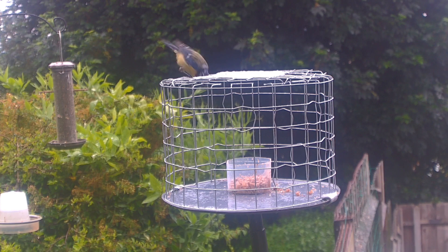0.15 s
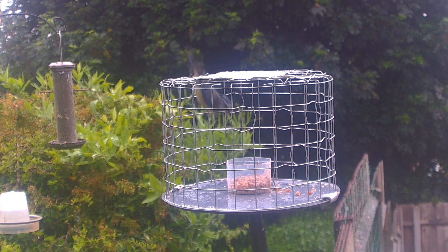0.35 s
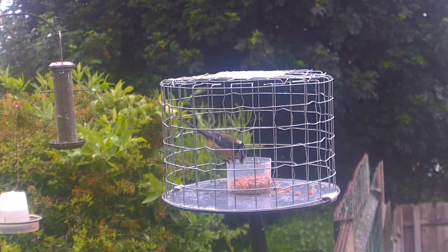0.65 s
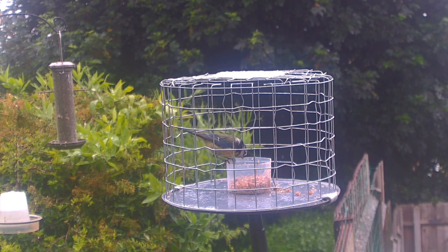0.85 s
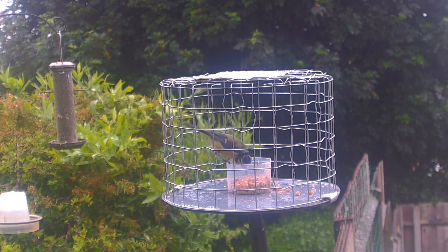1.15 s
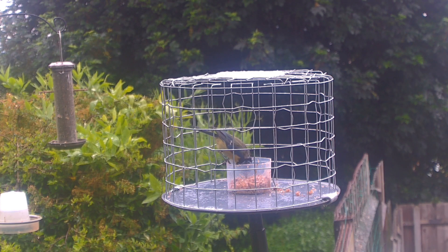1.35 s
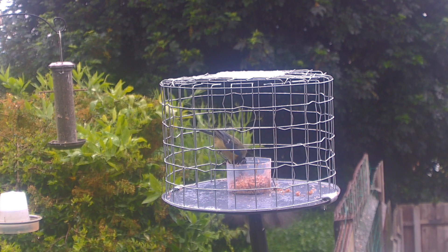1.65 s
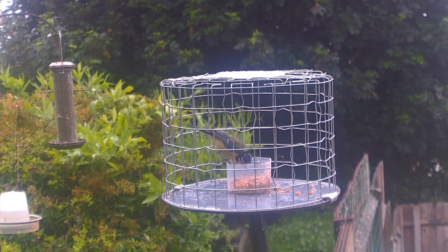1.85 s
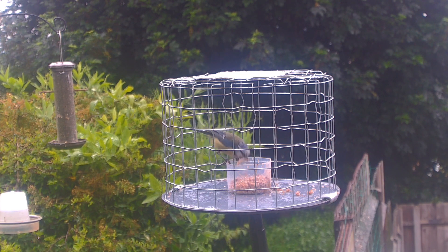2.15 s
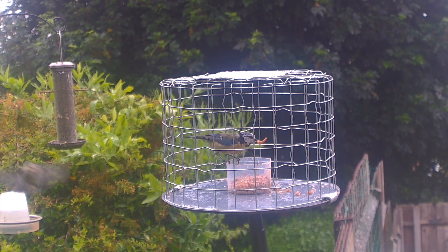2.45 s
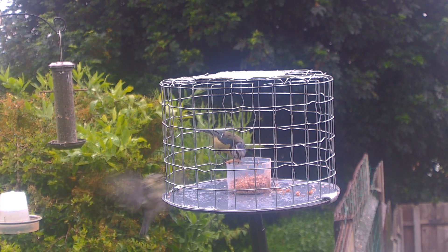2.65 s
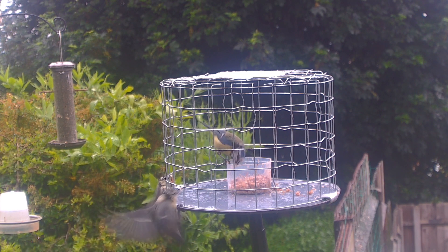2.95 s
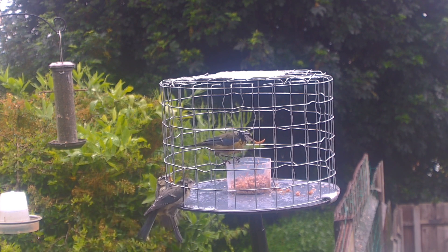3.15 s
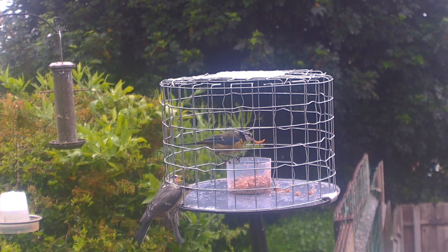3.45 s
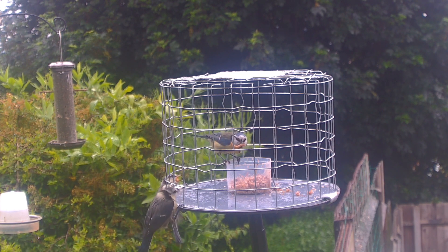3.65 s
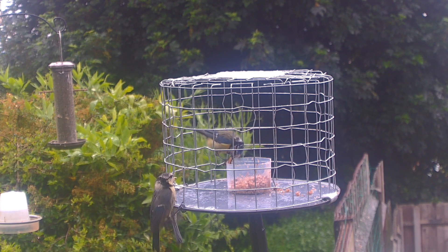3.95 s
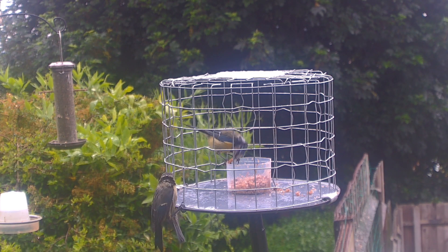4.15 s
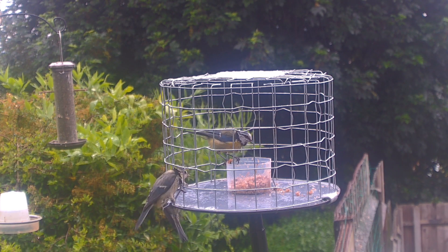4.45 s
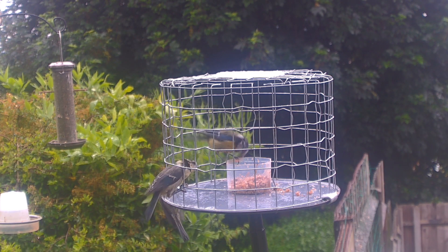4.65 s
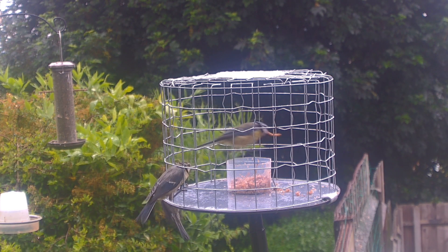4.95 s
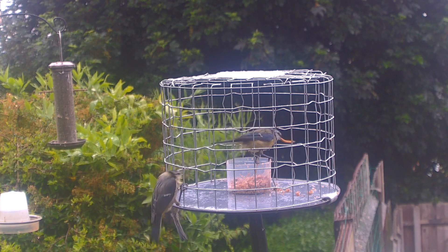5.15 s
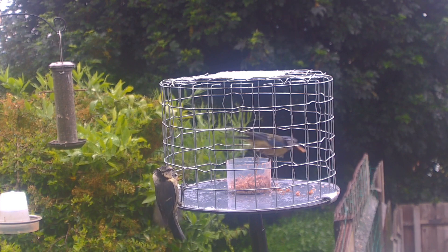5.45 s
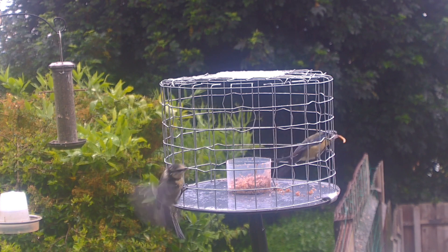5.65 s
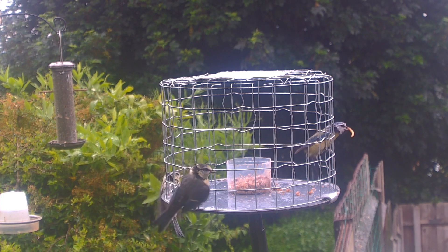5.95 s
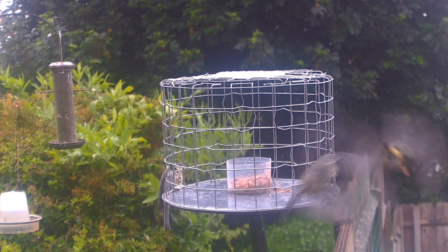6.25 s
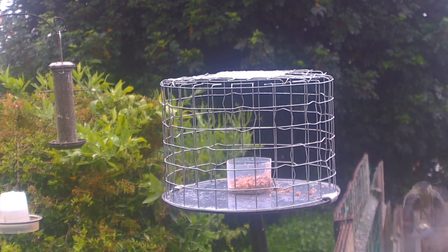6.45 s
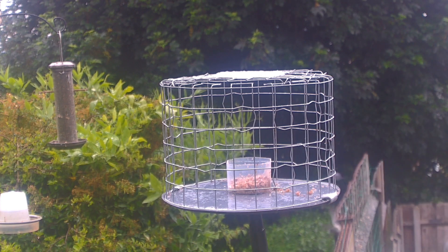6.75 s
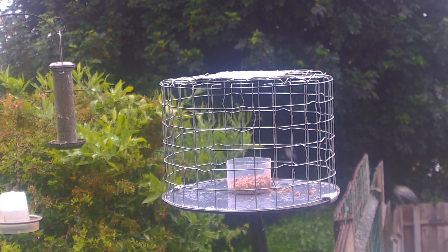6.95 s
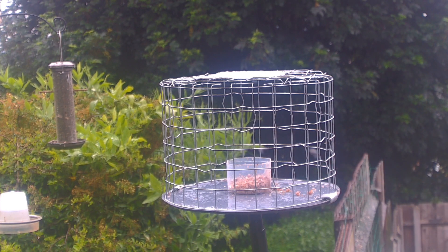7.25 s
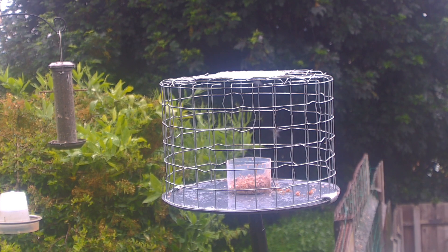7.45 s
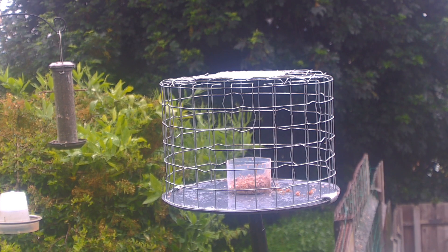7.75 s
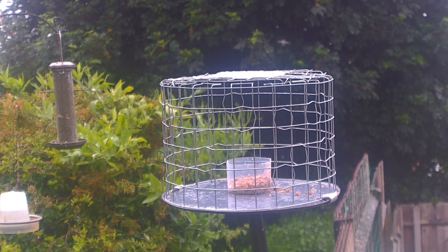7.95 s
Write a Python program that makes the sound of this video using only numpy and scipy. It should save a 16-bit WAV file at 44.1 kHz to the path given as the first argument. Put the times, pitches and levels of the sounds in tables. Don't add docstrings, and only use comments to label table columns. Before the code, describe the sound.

Thin piercing bird peeps give way to urgent fledgling begging calls, with tiny ticks on wire, soft rain hiss and faint rumble in a garden.

```python
import sys
import numpy as np
from scipy import signal
from scipy.fft import rfft, irfft, next_fast_len
from scipy.io import wavfile
from scipy.ndimage import uniform_filter1d, map_coordinates

SR = 44100
rng = np.random.default_rng(int(sys.argv[2]) if len(sys.argv) > 2 else 0)


def int16_out(signal):
    q = np.round(np.clip(np.atleast_2d(signal).T, -1, 1) * 32767)
    wavfile.write(sys.argv[1], SR, q.astype(np.int16))


def attenuation_scalar(level_db):
    decades = np.asarray(level_db, float) / 20
    return 10 ** decades


N = 357210
T = np.arange(N) / SR

# hz, level_db
RAIN_SPECTRUM = [(300, -55.5), (700, -22.5), (1500, -15), (1950, -13.5), (2220, -4.5), (2450, 1.5),
                 (2950, -13), (3700, -14), (4460, -29), (6750, -36), (7500, -36.5), (8000, -53.5)]
# hz, level_db
RUMBLE_SPECTRUM = [(12, -26), (25, 1.5), (50, -2.5), (80, -13), (135, -13), (190, -19), (250, -21),
                   (450, -26), (800, -36.5), (2000, -64)]
# hz, rms_db
HUM_LINES = [(50, -53), (100, -66.5), (150, -64), (166, -69), (250, -77.5), (350, -91.5)]
# start_s, peak_db
TICKS = [
    (.004, -42.5),
    (0.031, -47),
    (2.851, -52),
    (2.954, -43),
    (3.012, -48),
    (3.059, -41),
    (3.262, -45.5),
    (3.301, -42),
    (5.722, -53),
    (7.882, -50),
]
# reached_s, top_hz, held_s, sag_hz_per_ms, peak_db
SEEPS = [(.012, 3745, 0.018, 4, -51), (.21, 7180, .08, 12.5, -42), (.378, 6950, .052, 24.5, -38),
         (1.575, 6660, .016, 4, -43.5), (1.677, 6960, 0.051, 12, -37), (1.825, 6410, .025, 15, -37.5),
         (5.49, 7840, 0.046, 10.5, -50.5), (5.749, 7900, .03, 17.5, -48), (5.856, 7890, 0.067, 9.5, -38.5),
         (6.006, 7620, 0.08, 9, -37.5), (6.741, 7280, 0.077, 18, -37.5), (7.15, 7000, 0.12, 9, -66),
         (7.502, 7050, .017, -14, -50.5), (7.603, 7620, .02, -9, -54), (7.715, 7620, .075, 12, -57),
         (7.975, 7380, 0.017, 14, -56)]
# length_s, first_hz, peak_db
SEEP_CLIMBS = [(0.007, 3000, -70), (.016, 4800, -54), (.006, 6700, -47), (0.016, 3100, -51.5),
               (0.035, 3500, -58), (.018, 3600, -38.5), (.02, 3100, -53.5), (0.034, 2000, -51),
               (0.017, 4000, -54), (.025, 2300, -52.5), (0.013, 4500, -56), (.01, 7100, -85),
               (0.036, 2900, -56), (0.016, 4300, -57), (.015, 3770, -80), (.015, 4200, -68)]
# reached_s, top_hz, held_s, sag_hz_per_ms, peak_db
BEGS = [(2.548, 6500, .003, 8, -60), (2.643, 6600, .013, -32.5, -58), (2.772, 7000, 0.021, -30.5, -44.5),
        (2.907, 6410, .015, -42, -53.5), (3.112, 4600, .003, 0, -54), (3.22, 7760, 0.042, 11.5, -29),
        (3.354, 7660, .056, 15.5, -34), (4.369, 7140, .018, 5.5, -35), (4.52, 7170, .04, 5.5, -36),
        (5.24, 6960, 0.012, 20, -40.5), (5.384, 7470, 0.028, 3.5, -39), (6.653, 6990, 0.0074, 20, -53)]
# climb_s, climb_start_hz, peak_db, lead_in_s
CHURRS = [(.024, 2450, -42.5, .014), (0.019, 2800, -43, .016), (.022, 2400, -43.5, .011),
          (.026, 2400, -40, .016), (.015, 2600, -39.5, .008), (.021, 2300, -42.5, .007),
          (0.027, 2350, -47.5, 0.0082), (.027, 2400, -36, .024), (.037, 2650, -39, .018),
          (.032, 2700, -40, 0.038), (.029, 2800, -44, 0.0095), (.021, 2250, -41.5, .025)]
UPPER_DB = [-24, -19, -24, -0.5, -15, -8, 1.5, -1.5, -0.5, -3, -10, -20, -1.5, -15, -15, -12, -2, 2, 1.5, 2,
            2, -1.5, 1.5, -0.5, -0.5, -4.5, -4, -9.5]
# landed_s, last_hz, tail_s, peak_db
FALLS = [
    (.456, 2780, 0.045, -45.5),
    (1.864, 2537, .055, -47),
    (6.83, 3300, 0.004, -44),
]
# start_s, length_s, top_hz, rising_share, peak_db
ARCHES = [
    (3.469, 0.12, 3600, 0.27, -43.5),
    (3.66, 0.11, 3170, .55, -37.5),
    (3.805, .095, 3340, 0.82, -37.5),
    (3.96, .14, 3273, .5, -39),
    (4.193, 0.099, 2767, 0.63, -37),
    (4.631, .126, 3284, 0.6, -41),
    (5.102, .055, 2610, .69, -38.5),
    (6.16, .119, 2812, 0.45, -43),
    (6.911, 0.14, 2850, 0.6, -45),
]
# first_hz, upper_over_lower, last_over_top, rise_bend, upper_db
VOICING = [(1940, 1.17, .76, 0.7, 3), (2000, 1.15, .82, .8, -1), (1960, 1.22, .95, .7, -1),
           (2010, 1.22, .77, 1.1, 1.5), (1920, 1.2, 0.69, 1.4, 0.5), (1980, 1.19, .76, 1, 3.5),
           (1940, 1.2, 0.91, 1, 0.5), (2120, 1.16, .91, 1.1, -0.5), (2225, 1.28, 0.9, 0.86, 2)]
# centre_s, pitch_factor, half_width_s
FLICKS = [
    (3.499, 1.3, 0.017),
    (3.713, 1.13, 0.011),
    (3.842, 1.14, .012),
    (3.885, 1.75, .017),
    (4.255, 1.11, .014),
    (4.691, 1.1, .01),
    (5.137, 1.08, .012),
]
# hz, gain_db
THROAT = [(1900, -2.5), (2500, 0), (3200, -1.54), (3900, -2.5), (5000, 2.6), (6200, 1.5), (7500, 0.7)]
# time_s, treble_db
FACING = [(0, -6.5), (1.4, -6.5), (2.4, -14), (2.95, -13), (3.15, -7), (3.4, -6.5), (3.6, -1.5),
          (5.3, -2.5), (6.3, -2), (6.6, -14), (6.7, -4.5), (7.1, -4.5), (7.4, -12.5)]
# delay_s, level_db
WALLS = [
    (.0075, -5),
    (.015, -7),
    (.022, -10),
    (.031, -16),
]
# hz, gain_db
ECHO_TREBLE = [(4000, -2), (5200, -8), (7500, -15)]
# start_s, end_s, start_hz, end_hz, level_db
FAR_NOTES = [
    (1.85, 3.05, 240, 210, -66.5),
    (6.48, 6.58, 1150, 1150, -72),
    (5.51, 5.535, 2150, 1900, -60),
    (7.16, 7.21, 1550, 1900, -72),
]
# hz, gain_db
MIC_CAVITY = [(1000, -24.5), (1800, -29), (2430, -0.5), (3000, -9.5), (3800, -0.5), (4700, -11.5),
              (7300, -11), (7900, -23), (8050, -74)]
# start_s, end_s
DROPOUTS = [
    (2.835, 2.895),
    (3.027, 3.15),
    (3.607, 3.725),
    (4.18, 4.238),
    (4.63, 4.688),
    (5.077, 5.135),
]

LEAD_HZ, LANDING_HZ, LONG_LEAD_S = 1877, 3440, .021
LOW_GAP, LINGER_GAP, CLIMB_GAP, FALL_GAP = 1.23, 1.29, 1.27, 1.28
ONSET_DB, LEAD_UPPER_DB, CLIMB_DB, CLIMB_UPPER_DB, SILENT_DB = -5.5, 3, -4, 2, -87
SWELL_SHARE = 0.31


def unit(x):
    return x / np.sqrt(np.mean(x ** 2) + 1e-20)


def coloured(x, points):
    m = next_fast_len(len(x) + 8192)
    hz, db = np.transpose(points)
    bins_hz = np.fft.rfftfreq(m, 1 / SR)
    gain = attenuation_scalar(np.interp(np.log(bins_hz + 1), np.log(hz), db))
    return irfft(rfft(x, m) * gain, m)[:len(x)]


def wobble(rate_hz, count=N):
    knots = rng.standard_normal(int(count * rate_hz / SR) + 4)
    return map_coordinates(knots, [np.arange(count) * rate_hz / SR])


def fade(t, start_s, end_s, rise_s, fall_s):
    return np.clip((t - start_s) / rise_s, 0, 1) * np.clip((end_s - t) / fall_s, 0, 1)


def rain():
    density_db = 1.2 * wobble(300) + .6 * wobble(12) + .4 * wobble(1.2)
    drops = rng.standard_normal(N) * attenuation_scalar(density_db)
    hiss = attenuation_scalar(-61) * unit(coloured(drops, RAIN_SPECTRUM))
    rumble = unit(coloured(rng.standard_normal(N), RUMBLE_SPECTRUM))
    return hiss + attenuation_scalar(-59 + .8 * wobble(2.5)) * rumble


def hum():
    out = np.zeros(N)
    for hz, db in HUM_LINES:
        out += attenuation_scalar(db + 2 + 0.15 * wobble(5)) * np.sin(2 * np.pi * (hz * T + rng.random()))
    return out


def ticks():
    out, t = np.zeros(N), np.arange(1200) / SR
    shape = attenuation_scalar(-60 * t / .025) * (1 - np.exp(-t / .0006))
    for start_s, db in TICKS:
        out[round(start_s * SR):][:len(t)] += attenuation_scalar(db + 11) * shape * unit(rng.standard_normal(len(t)))
    return coloured(out, [(3600, 0), (4800, -12), (7500, -26)])


def rising(upper_db, reached_s, top_hz, held_s, sag, note_db, climb_s, knee_hz, db, lead_s=0):
    def climb_hz(share):
        return knee_hz * (top_hz / knee_hz) ** share

    def held_hz(share):
        return top_hz - 1000 * sag * held_s * share

    up_db = db + upper_db
    knee_s, end_s = reached_s - climb_s, reached_s + held_s
    rows = []
    if lead_s:
        risen = 0.091 if lead_s > LONG_LEAD_S else 0.531
        linger_hz = LEAD_HZ + risen * (knee_hz - LEAD_HZ)
        rows += [(knee_s - lead_s, LEAD_HZ, LOW_GAP, db + ONSET_DB, up_db + ONSET_DB + LEAD_UPPER_DB),
                 (knee_s - lead_s * .4, linger_hz, LINGER_GAP, db - 2.5, up_db + LEAD_UPPER_DB)]
    lower_db, upper_db = db + CLIMB_DB, up_db + CLIMB_DB + CLIMB_UPPER_DB
    rows += [(knee_s, knee_hz, LOW_GAP, db, up_db + LEAD_UPPER_DB),
             (reached_s - climb_s / 2, climb_hz(.52), CLIMB_GAP, lower_db, upper_db),
             (reached_s - climb_s / 4, climb_hz(.84), CLIMB_GAP, lower_db, upper_db),
             (reached_s, top_hz, LOW_GAP, note_db - 6.5, SILENT_DB),
             (reached_s + held_s * SWELL_SHARE, held_hz(SWELL_SHARE * 0.57), LOW_GAP, note_db, SILENT_DB),
             (end_s, held_hz(1), LOW_GAP, note_db - 8, SILENT_DB)]
    for landed_s, last_hz, tail_s, fall_db in FALLS:
        if reached_s < landed_s < end_s + .05:
            rows[-1] = (end_s, held_hz(1), LOW_GAP, note_db, SILENT_DB)
            plunge_s = end_s + .4 * (landed_s - end_s)
            plunge_hz = LANDING_HZ + 0.46 * (held_hz(1) - LANDING_HZ)
            rows += [(plunge_s, plunge_hz, LOW_GAP, fall_db + 5, fall_db + 1),
                     (landed_s, LANDING_HZ, FALL_GAP, fall_db, fall_db),
                     (landed_s + tail_s * .35, last_hz * 1.12, FALL_GAP, fall_db, fall_db - 0.5),
                     (landed_s + tail_s, last_hz, FALL_GAP, fall_db - 11.5, fall_db - 11.5)]
    return [(t, hz, hz * gap, a, b) for t, hz, gap, a, b in rows]


def arching(arch, voicing):
    start_s, length_s, top_hz, crest, db = arch
    first_hz, gap, last, bend, upper_db = voicing
    u = np.linspace(0, 1, 21)
    rise_hz = first_hz + (top_hz - first_hz) * np.sin(np.pi / 2 * np.clip(u / crest, 0, 1) ** bend)
    hz = rise_hz * (1 - (1 - last) * np.clip((u - crest) / (1 - crest), 0, 1) ** 1.9)
    edges = [0, .12, 1 - 0.24, 1]
    lower = db + np.interp(u, edges, [ONSET_DB, 0, 0, -14.5])
    upper = db + np.interp(u, edges, [ONSET_DB, 0, 0, -8.5])
    return np.transpose([start_s + u * length_s, hz, hz * gap, lower, upper + upper_db])


def syrinx(rows):
    knot_s, *columns = np.transpose(rows)
    at = np.arange(max(round((knot_s[0] - .003) * SR), 0), round((knot_s[-1] + 0.0073) * SR))
    t, size = at / SR, len(at)
    lift = np.ones(size)
    for centre_s, factor, half_s in FLICKS:
        lift += (factor - 1) * np.clip(1 - abs(t - centre_s) / half_s, 0, 1)
    curves = [uniform_filter1d(np.interp(t, knot_s, column) * scale, size=201, mode="nearest")
              for column, scale in zip(columns, (lift, lift, 1, 1))]
    pitches_hz, levels_db = curves[:2], curves[2:]
    low, high = [2 * np.pi * np.cumsum(hz + 25 * wobble(300, size)) / SR for hz in pitches_hz]
    throat_hz, throat_db = np.transpose(THROAT)
    sides = []
    for hz, db in zip(pitches_hz, levels_db):
        flutter_db = 2.4 * wobble(220, size) + 1.8 * wobble(70, size)
        sides.append(attenuation_scalar(db + np.interp(hz, throat_hz, throat_db) + flutter_db))
    a, b = sides
    both = np.sqrt(a * b)
    voice = a * np.sin(low) + b * np.sin(high)
    a, b = [side * (2500 / hz) ** 0.41 for side, hz in zip(sides, pitches_hz)]
    voice += attenuation_scalar(-3) * a * np.sin(2 * low) + attenuation_scalar(-8) * b * np.sin(2 * high) + attenuation_scalar(-21) * a * np.sin(3 * low)
    voice += both * attenuation_scalar(-15) * np.sin(low + high)
    voice += both * (attenuation_scalar(-20.5) * np.sin(2 * high - low) + attenuation_scalar(-13.5) * np.sin(2 * low - high))
    voice += attenuation_scalar(-5) * both * rng.standard_normal(size)
    return at, voice * fade(t, t[0], t[-1], 0.006, 0.011)


def fledglings():
    calls = [rising(upper_db, *note, *climb)
             for upper_db, note, climb in zip(UPPER_DB, SEEPS + BEGS, SEEP_CLIMBS + CHURRS)]
    calls += [arching(arch, voicing) for arch, voicing in zip(ARCHES, VOICING)]
    out = np.zeros(N)
    for rows in calls:
        at, voice = syrinx(rows)
        out[at] += voice
    return out


def garden(x):
    t = np.arange(SR // 4) / SR
    tail = unit(rng.standard_normal(len(t)) * attenuation_scalar(-60 * t / 0.18) * (t > .003)) / np.sqrt(len(t))
    tail = coloured(tail, [(2000, -2.5), (2430, 2.5), (3000, -1.5), (3750, 0.5), (4400, -1.5)])
    smear = rng.standard_normal(len(t)) / np.sqrt(.0025 * SR)
    walls = sum(attenuation_scalar(db) * smear * np.exp(-((t - delay_s) / .002) ** 2) for delay_s, db in WALLS)
    return coloured(signal.fftconvolve(x, attenuation_scalar(-3) * tail + walls)[:N], ECHO_TREBLE)


def far_notes():
    out = np.zeros(N)
    for start_s, end_s, start_hz, end_hz, db in FAR_NOTES:
        hz = np.interp(T, [start_s, end_s], [start_hz, end_hz]) * (1 + .006 * wobble(30))
        edge_s = 0.096 * (end_s - start_s)
        level = attenuation_scalar(db + 2.7 * wobble(9.9)) * fade(T, start_s, end_s, edge_s, edge_s)
        out += level * np.sin(2 * np.pi * np.cumsum(hz) / SR)
    return out


def scene():
    background = rain() + hum()
    knocks = ticks()
    calls = fledglings()
    treble = coloured(calls, [(4300, -40), (5000, 0)])
    turned = attenuation_scalar(np.interp(T, *np.transpose(FACING)))
    direct = calls - (1 - turned) * treble
    sideways = attenuation_scalar(-8) + (1 - turned) * .8
    near = direct + garden(calls * sideways) + knocks
    return (coloured(near, MIC_CAVITY) + far_notes() + background)[None]


def top_cut(x):
    return signal.sosfilt(signal.butter(12, 8880, fs=SR, output="sos"), x)


def record(dry):
    x = dry[0]
    image = x * 2 * np.cos(2 * np.pi * 16000 * T)
    x = x + coloured(image, [(8030, -92), (8150, -1), (8600, -21), (9000, -24.5), (9300, -80)])
    gate = sum(fade(T, start_s, end_s, .004, .004) for start_s, end_s in DROPOUTS)
    x = x - gate * coloured(x, [(4450, -90), (4640, 0)])
    return top_cut(x[None])


dry = scene()
out = record(dry)
int16_out(out)
```